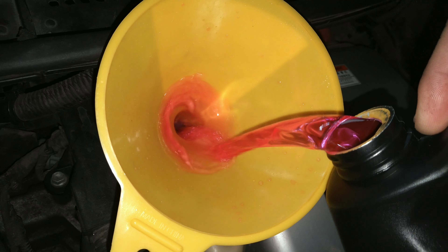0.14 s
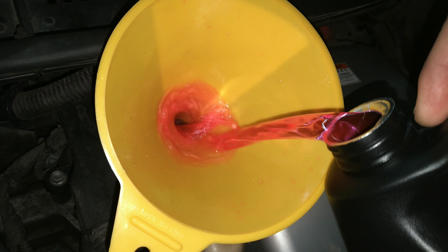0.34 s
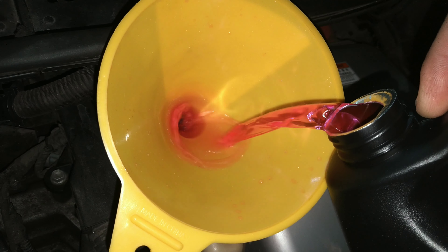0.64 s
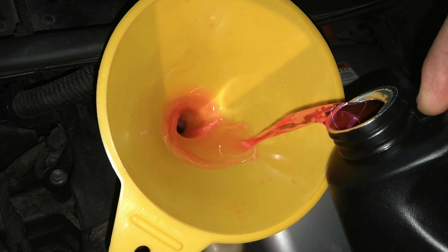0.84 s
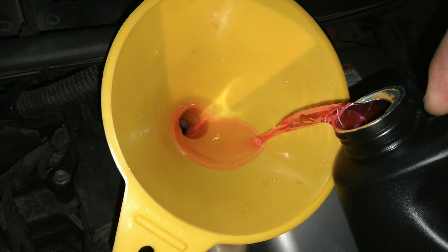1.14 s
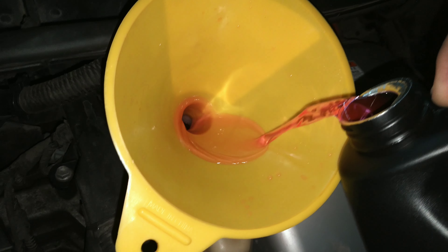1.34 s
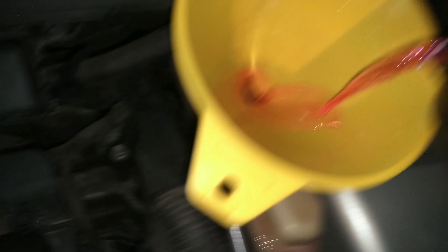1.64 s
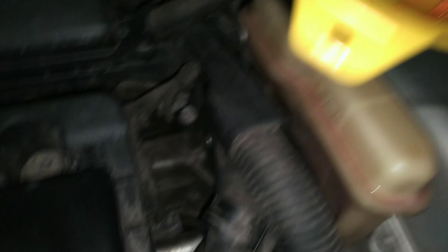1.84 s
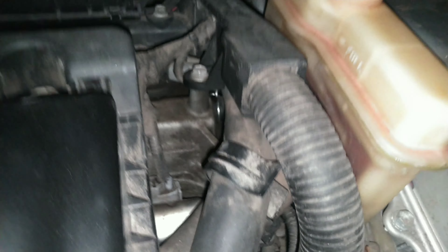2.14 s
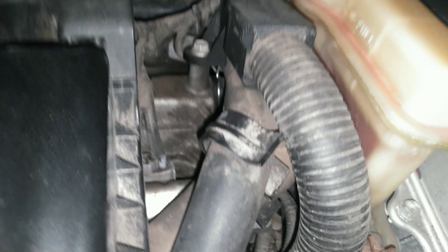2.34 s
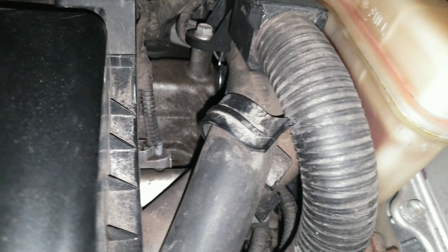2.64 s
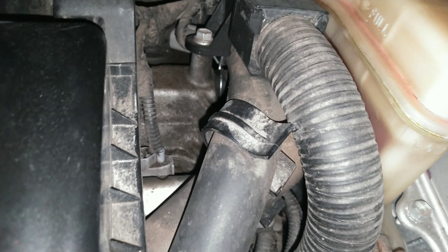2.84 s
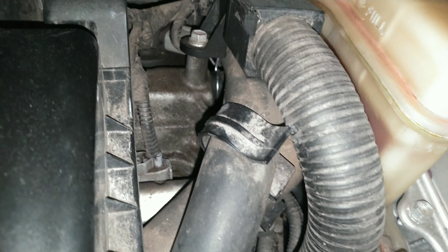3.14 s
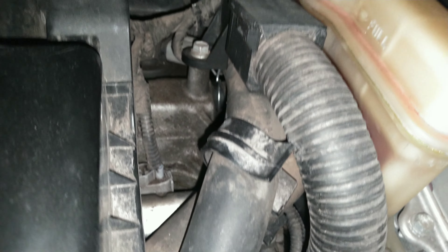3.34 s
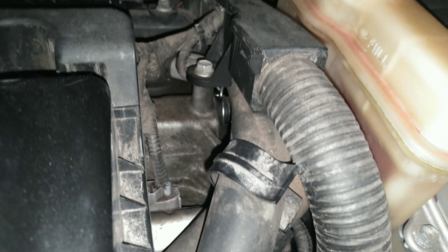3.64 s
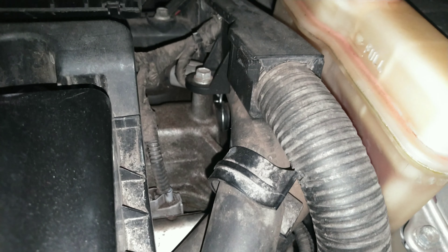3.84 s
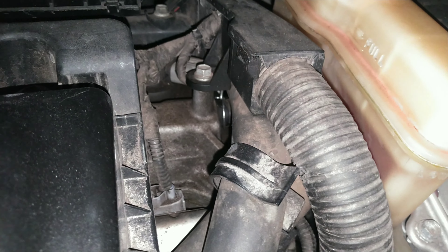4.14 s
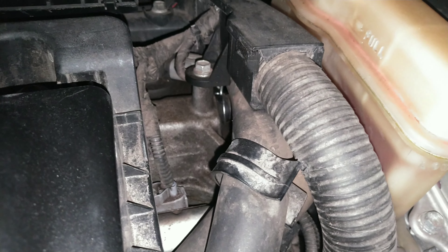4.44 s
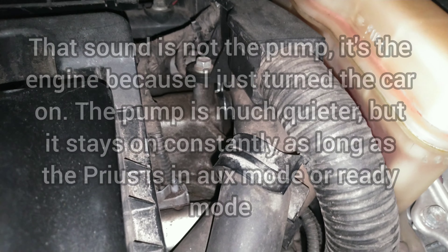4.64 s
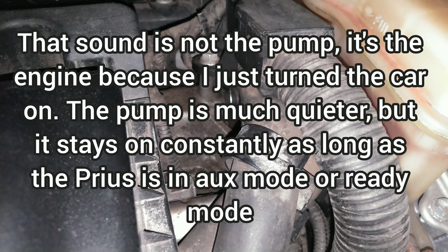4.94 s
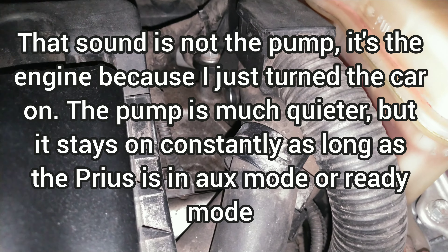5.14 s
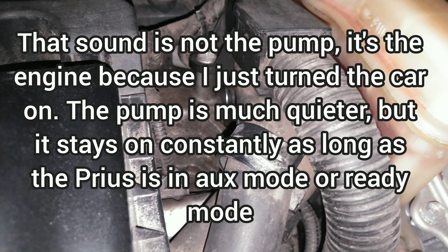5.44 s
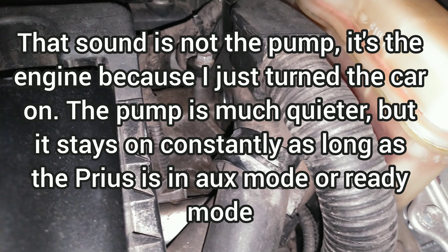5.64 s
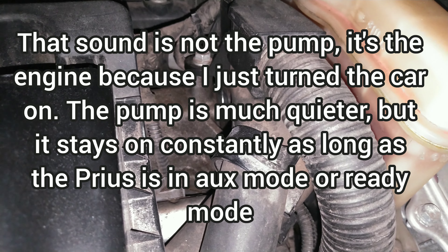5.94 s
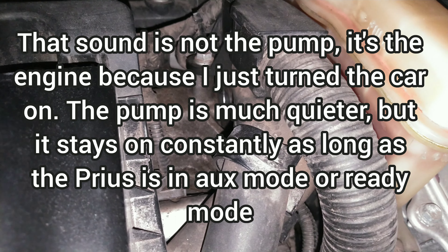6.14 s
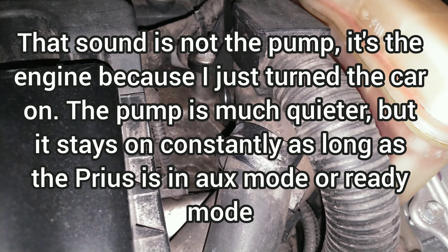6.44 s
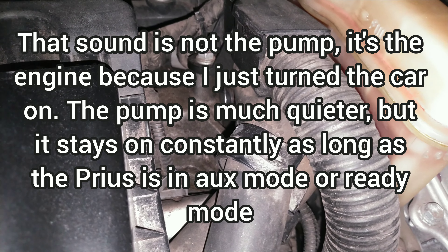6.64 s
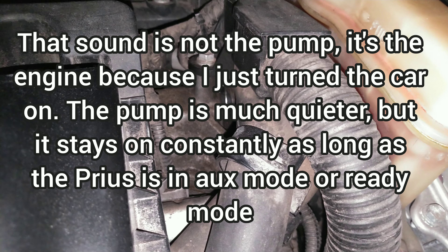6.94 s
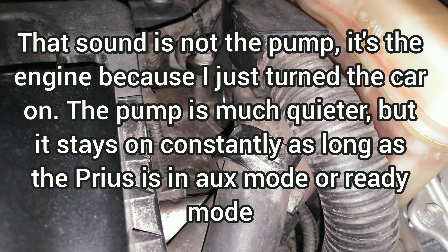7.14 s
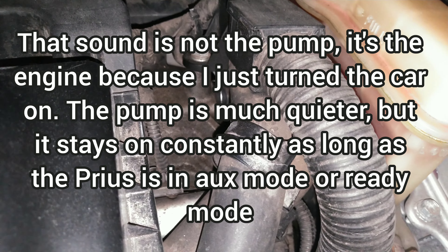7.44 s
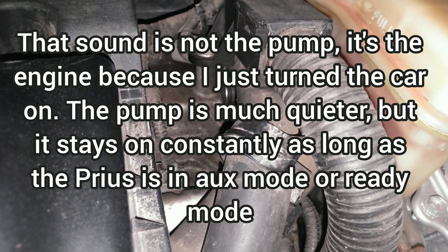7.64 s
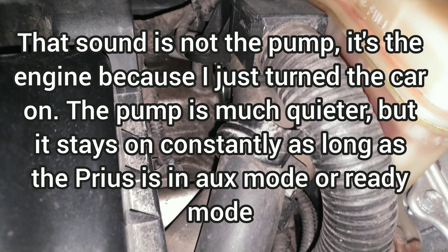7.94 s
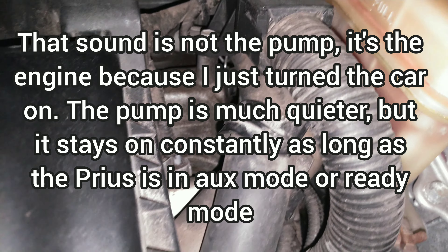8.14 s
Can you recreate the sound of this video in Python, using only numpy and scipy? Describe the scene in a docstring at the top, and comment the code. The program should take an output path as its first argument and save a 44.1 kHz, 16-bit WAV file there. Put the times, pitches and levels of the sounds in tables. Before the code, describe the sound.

A fast engine idle and a softly humming electric coolant pump are heard from just above the engine, dry and identical in both channels. The first second is very loud, with a small hollow gulp as liquid pours through a funnel. Then the volume falls sharply. Around 1.7 seconds a bright metallic knocking stands out and slowly recedes, while hum, rattling valves, crisp ticking, hiss and thin whines carry on steadily.

```python
"""A four-cylinder petrol engine at fast idle and its electric coolant pump, heard just above the open engine bay.
It starts loud at the funnel: firings hum and thump, valve gear clatters, injectors tick in the top treble.
Coolant gulps faintly in the funnel three times within the first 1.3 s; at 1.1 s the volume is cut through a brief dip.
From 1.35 s the microphone moves to the hoses: a bright knock flares up and fades, and the balance of the parts shifts.
Tones are summed sines, knocks and ticks are struck resonances, belt, chain and air are coloured noise."""
import sys
import numpy as np
from scipy import signal
from scipy.fft import rfft, irfft
from scipy.io import wavfile

SR = 44100
rng = np.random.default_rng(int(sys.argv[2]) if len(sys.argv) > 2 else 0)


def dump(signal):
    """Clip the signal to [-1, 1] and save it as 16-bit WAV at the path in sys.argv[1]."""
    limited = np.clip(np.atleast_2d(signal).T, -1, 1)
    pcm = np.round(limited * 32767).astype(np.int16)
    wavfile.write(sys.argv[1], SR, pcm)


N = 366030
TIME = np.arange(N) / SR
# All levels of the sources are set ahead of the volume control.


def undb(db):
    """Decibels to gain."""
    return 10 ** (np.asarray(db) / 20)


def curve(rows, column=1):
    """One column of a table, joined by straight lines in time."""
    rows = np.array(rows)
    return np.interp(TIME, rows[:, 0], rows[:, column])


def unit(x):
    """Scale to rms 1."""
    return x / np.sqrt(np.mean(x ** 2))


def walk(rate):
    """Random wander with a spread near 1, taking `rate` new values a second."""
    knots = rng.standard_normal(400)
    return 1.22 * np.interp(TIME * rate, np.arange(len(knots)), knots)


def ring(x, hz, width):
    """A resonance with steep skirts, from two equal peak filters in a row; rms 1."""
    section = np.concatenate(signal.iirpeak(min(hz, .45 * SR), hz / width, fs=SR))
    return unit(signal.sosfilt([section, section], x))


def tone(cycle, order, lag=.29, spread=.002):
    """One multiple of the cycle rate, rms 1; the low ones leave the block later, which smears each firing."""
    return np.sqrt(2) * np.cos(2 * np.pi * order * (cycle - lag + spread * order))


def whine(hz, waver_hz=6):
    """A thin tone of slightly unsteady pitch; rms 1."""
    return np.sqrt(2) * np.sin(2 * np.pi * np.cumsum(hz + waver_hz * walk(25)) / SR)


def rattle(cycle, repeat, size=4064):
    """Dense impacts; the share `repeat` of their power comes back alike in every engine cycle."""
    repeat = np.clip(repeat, 0, 1)
    pattern = rng.standard_normal(size)[(cycle * size).astype(int) % size]
    fresh = rng.standard_normal(N)
    return np.sqrt(repeat) * pattern + np.sqrt(1 - repeat) * fresh


def blow(cycle, at, rise, decay, scatter_db, size=1024):
    """Force of a blow that falls once a cycle, each a little different; rise and decay in cycles."""
    age = np.arange(size) / size
    shape = (1 - np.exp(-age / rise)) * np.exp(-age / decay)
    step = ((cycle - at + 2) * size).astype(int)
    strength = undb(scatter_db * rng.standard_normal(size))
    return shape[step % size] * strength[step // size]


def tap(cycle, at, jitter=0.0035, scatter_db=-0.2):
    """One hard contact a cycle, never quite on time (jitter in cycles) or equally strong."""
    turns = np.arange(int(cycle[-1]) + 1)
    chance = rng.standard_normal((len(turns), 2))
    index = np.searchsorted(cycle, turns + at + jitter * chance[:, 0])
    inside = (index > 0) & (index < N)
    return np.bincount(index[inside], undb(scatter_db * chance[inside, 1]), N)


# microphone path: time_s, place (0 funnel - 1 hoses), valve_gear_exposure_db
MICROPHONE = [(0, 0.12, -0.1), (1.35, 0.074, 0.7), (1.75, 0.86, -0.4), (3.5, 1, -0.5), (6.5, 1, -2.5),
              (8.3, 1, -0.2)]


def microphone_place():
    """Where the microphone is between the funnel (0) and the hoses (1)."""
    return np.clip(curve(MICROPHONE), 0, 1)


def heard(funnel_db, hoses_db, place):
    """Gain of a part of the engine as the microphone moves between its two places."""
    return undb(funnel_db) * (1 - place) + undb(hoses_db) * place


# noise colour of belt, chain and air: pitch_hz, funnel_db_per_hz, hoses_db_per_hz
RUSH_COLOUR = [(30, -90, -90), (60, -80, -85), (132, -77.5, -76), (260, -84.5, -80), (452, -73.5, -75.5),
               (750, -80.5, -75.5), (1010, -75.5, -75.5), (1150, -80, -80), (1760, -78, -75.5),
               (3200, -79, -78), (4880, -83, -81.5), (9200, -86.5, -85), (10200, -83.5, -84),
               (15500, -89, -87)]


def rush(cycle, place, repeat_from_hz=480, repeat_below_hz=1700, throb=0.043):
    """Belt, chain and air: the middle range partly repeats with the cycle, the rest is hiss throbbing with the pistons."""
    hz = np.arange(N // 2 + 1) * SR / N + 1
    share = .6 / (1 + (hz / repeat_below_hz) ** 2) / (1 + (repeat_from_hz / hz) ** 4)
    hiss = rng.standard_normal(N) * (1 + throb * np.cos(2 * np.pi * 8 * cycle))
    repeating = np.sqrt(share) * rfft(rattle(cycle, repeat=0.99))
    drive = repeating + np.sqrt(1 - share) * rfft(hiss)
    points, *colours = np.transpose(RUSH_COLOUR)
    at_funnel, at_hoses = (irfft(drive * undb(np.interp(np.log(hz), np.log(points), db)), N)
                           for db in colours)
    return np.sqrt(SR / 2) * (at_funnel * (1 - place) + at_hoses * place)


# whines of steady level: pitch_hz, funnel_db, hoses_db
STEADY_WHINES = [(4062, -67, -61), (10002, -68, -68)]
# thin whine, mean level: funnel_db, hoses_db
THIN_WHINE_DB = (-59, -61.5)
THIN_HZ, THIN_GROWTH_DB_PER_S = 5940, 1.3


def whines(place, waver_db=2):
    """Pump or power electronics: two steady whines and a thin one whose level wanders and slowly grows."""
    steady = sum(heard(funnel_db, hoses_db, place) * whine(hz) for hz, funnel_db, hoses_db in STEADY_WHINES)
    swell_db = waver_db * walk(3) + THIN_GROWTH_DB_PER_S * (TIME - TIME.mean())
    thin = heard(*THIN_WHINE_DB, place) * undb(swell_db) * whine(THIN_HZ)
    return steady + thin


# coolant gulps in the funnel's throat: middle_s, pitch_hz, length_s, level_db
FUNNEL_GULPS = [(0.79, 519, 0.04, -44.5), (1.046, 530, 0.022, -55), (1.27, 512, 0.045, -55)]


def funnel():
    """Air in the funnel's throat sounds a brief hollow note as the coolant closes over it."""
    return sum(undb(db) * np.exp(-((TIME - middle) / length) ** 2) * whine(hz, waver_hz=15.0)
               for middle, hz, length, db in FUNNEL_GULPS)


# electric coolant pump: multiple_of_shaft_rate, funnel_db, hoses_db
PUMP_TONES = [(3, -50.5, -52), (4, -58.5, -66), (5, -73, -75), (8, -61.5, -59)]
PUMP_HZ = 52.55  # mean shaft rate


def pump(place, waver_hz=0.33, waver=0.072):
    """The impeller turns at its own, slightly wandering speed, so its tones beat against the engine's."""
    turns = np.cumsum(PUMP_HZ + waver_hz * walk(14)) / SR
    tones = (heard(funnel_db, hoses_db, place) * (1 + waver * walk(20)) * np.sin(2 * np.pi * round(k) * turns)
             for k, funnel_db, hoses_db in PUMP_TONES)
    return np.sqrt(2) * sum(tones)


# injector needles: opening_place (0-1 of a cycle), relative_opening_db, relative_closing_db
NEEDLES = [(.19, 2.5, 3), (.445, 0.5, 3), (.71, 4.5, 1), (.95, 2.5, 0)]
# ring of the lifting needles: pitch_hz, width_hz, funnel_db, hoses_db
LIFT_RING = [(11660, 1400, -56, -52.5), (13620, 580, -50, -49), (13940, 420, -52.5, -51)]
# ring of the seating needles: pitch_hz, width_hz, funnel_db, hoses_db
SEAT_RING = [(15030, 450, -56, -46), (15620, 1100, -44.5, -41.5)]


def injectors(cycle, place, open_for=0.055):
    """Each needle ticks as it lifts and again, higher, as it seats `open_for` cycles later."""
    lift = sum(undb(db) * blow(cycle, at, rise=.012, decay=0.12, scatter_db=.5) for at, db, _ in NEEDLES)
    seat = sum(undb(db) * blow(cycle, at + open_for, rise=.014, decay=0.052, scatter_db=1.5)
               for at, _, db in NEEDLES)
    out = 0
    for force, modes in ((lift, LIFT_RING), (seat + 0.28 * lift, SEAT_RING)):
        drive = force * rattle(cycle, repeat=0.55)
        out = out + sum(heard(funnel_db, hoses_db, place) * ring(drive, hz, width)
                        for hz, width, funnel_db, hoses_db in modes)
    return out


# valve-gear knocks: place_in_cycle (0-1), ring_hz, width_hz, funnel_db, hoses_db (before exposure)
VALVE_KNOCKS = [(.02, 2020, 350, -59, -56.5), (.065, 906, 460, -60, -57.5), (0.101, 2030, 610, -61, -54.5),
                (.10, 2970, 1620, -59, -54), (.125, 983, 354, -60, -69), (0.188, 3100, 1400, -58, -62),
                (0.329, 2112, 260, -60.5, -55.5), (0.336, 3160, 1810, -76, -54), (.38, 943, 392, -55, -62),
                (.44, 1956, 205, -50, -61), (0.431, 3860, 700, -59, -63), (.475, 894, 396, -61.5, -59),
                (.57, 880, 443, -62, -57), (0.631, 920, 403, -59, -63), (.755, 2110, 400, -65, -61.5),
                (0.851, 2000, 400, -59, -62), (.87, 986, 348, -56, -59)]


def valves(cycle, place, contact=0.01804, clean_below_hz=400):
    """Each knock rings its own part of the head: the narrow rings as a clean tap, the wide ones as a rattle."""
    grain = rattle(cycle, repeat=0.55)
    out = 0
    for at, hz, width, funnel_db, hoses_db in VALVE_KNOCKS:
        clean = 1 / (1 + (width / clean_below_hz) ** 4)
        struck = ring(tap(cycle, at + contact), hz, .5 * width)
        force = blow(cycle, at, rise=0.035, decay=0.033, scatter_db=0.5)
        shaken = ring(grain * force, hz, width)
        knock = np.sqrt(clean) * struck + np.sqrt(1 - clean) * shaken
        out = out + heard(funnel_db, hoses_db, place) * knock
    return out * undb(curve(MICROPHONE, column=2))


BRIGHT_HZ, BRIGHT_WIDTH_HZ, BRIGHT_PEAK_DB = 2120, 70, -50.5
BRIGHT_PEAK_S, BRIGHT_RISE_DB_PER_S, BRIGHT_FALL_DB_PER_S = 1.72, 40, 6


def bright_knock(cycle, at=.45):
    """A bright ring of the hardest knock comes up quickly as the microphone leaves the funnel, then fades slowly."""
    since = TIME - BRIGHT_PEAK_S
    db = BRIGHT_PEAK_DB + np.minimum(BRIGHT_RISE_DB_PER_S * since, -BRIGHT_FALL_DB_PER_S * since)
    return undb(db) * ring(tap(cycle, at), BRIGHT_HZ, BRIGHT_WIDTH_HZ)


# resonances shaken by every firing: pitch_hz, width_hz, funnel_db, hoses_db
BLOCK_RING = [(164.8, 50, -50.5, -56.5), (213, 48, -59.5, -66.5), (333.6, 25, -58, -60),
              (433, 64, -72, -52), (510, 150, -52.5, -66), (790, 84, -62.5, -57.5), (942, 250, -51, -57),
              (1280, 67, -81, -56), (2154, 130, -54.5, -63.5), (2664, 260, -69, -55.5)]


def block(cycle, place, first=0.058, steady=0.83):
    """Four firings a cycle shake the block and the intake, over a steady rumble."""
    firings = sum(blow(cycle, first + k / 4, rise=0.027, decay=0.077, scatter_db=4.0) for k in range(4))
    drive = (steady + firings) * rattle(cycle, repeat=0.096)
    return sum(heard(funnel_db, hoses_db, place) * ring(drive, hz, width)
               for hz, width, funnel_db, hoses_db in BLOCK_RING)


# steady engine tones: multiple_of_cycle_rate, funnel_db, hoses_db
STEADY_ORDERS = [(4, -53.5, -53.5), (8, -47, -46), (12, -57, -54.5), (14, -60, -66), (16, -58, -57.5),
                 (20, -62.5, -56.5), (24, -66, -65), (32, -63, -62), (44, -59, -57.5), (52, -63, -64),
                 (56, -68, -60.5), (68, -68, -60), (72, -60, -63), (80, -65, -60.5), (84, -56, -60),
                 (88, -63, -62), (98, -67, -60), (112, -72, -65)]
# booming engine tones: multiple_of_cycle_rate, funnel_db, hoses_db
BOOMING_ORDERS = [(28, -57.5, -52.5), (36, -66, -51), (40, -53.5, -53.5)]


def hum(cycle, place, waver=0.016, boom_waver_db=1.3):
    """Firing pulses and shaking pistons give clean multiples of the cycle rate; the booming ones swell and sink."""
    # the higher a steady tone, the more its level wavers
    steady = sum(heard(funnel_db, hoses_db, place) * (1 + waver * k ** .5 * walk(9)) * tone(cycle, k)
                 for k, funnel_db, hoses_db in STEADY_ORDERS)
    boom = sum(heard(funnel_db, hoses_db, place) * undb(boom_waver_db * walk(3)) * tone(cycle, round(k))
               for k, funnel_db, hoses_db in BOOMING_ORDERS)
    return steady + boom


# crankshaft speed, wavering around a fast idle: time_s, speed_rpm
CRANK_SPEED = [(0.0, 1311.0), (0.3, 1330.7), (1.3, 1289.7), (2.0, 1309.3), (2.3, 1287.3), (2.8, 1308.2),
               (3.6, 1291.5), (3.9, 1300.7), (6.0, 1301.5), (6.8, 1295.9), (7.4, 1312.4), (7.7, 1284.8),
               (8.3, 1300.1)]


def crankshaft():
    """Engine cycles run so far; a four-stroke cycle takes two turns of the crankshaft."""
    return .043 + np.cumsum(curve(CRANK_SPEED)) / (2 * 60 * SR)


# span of the volume cut: start_s, end_s
VOLUME_CUT = (1.092, 1.096)
# brief dip around the cut: time_s, level_db
VOLUME_DIP = [(1.092, 0), (1.0975, -17), (1.104, -10), (1.112, -1.5), (1.125, 0)]
LOUD_DB, LOW_DB = 15, 0.28  # volume before and after the cut


def volume():
    """Gain of the volume control, which starts high and is cut down abruptly through a brief dip."""
    return undb(np.interp(TIME, VOLUME_CUT, (LOUD_DB, LOW_DB)) + curve(VOLUME_DIP))


def scene():
    """The engine bay at the moving microphone, under the volume control, alike in both channels."""
    cycle = crankshaft()
    place = microphone_place()
    bay = rush(cycle, place) + whines(place) + funnel() + pump(place)
    bay = bay + injectors(cycle, place) + valves(cycle, place) + bright_knock(cycle)
    bay = bay + block(cycle, place) + hum(cycle, place)
    return np.tile(bay * volume(), (2, 1))


TOP_HZ = 15750


def record(dry):
    """The recorder cuts everything above its top frequency steeply."""
    return signal.sosfilt(signal.ellip(12, .2, 80, TOP_HZ, fs=SR, output="sos"), dry)


dry = scene()
out = record(dry)
dump(out)
```